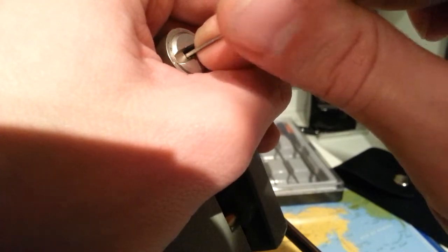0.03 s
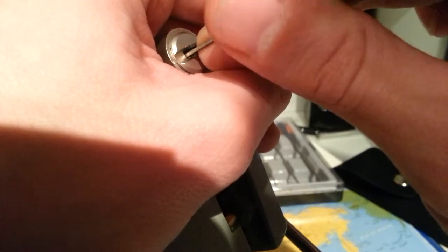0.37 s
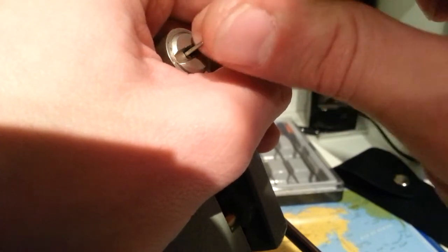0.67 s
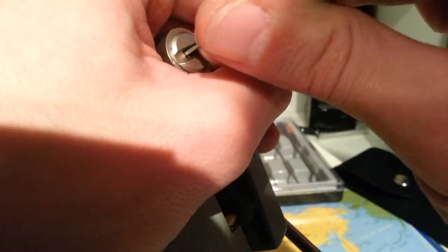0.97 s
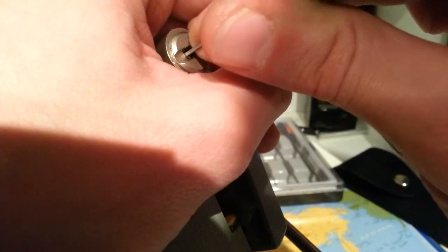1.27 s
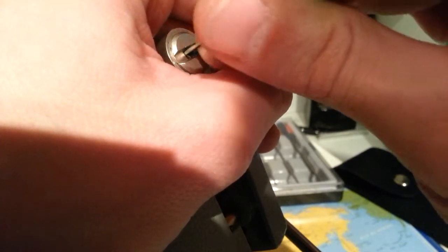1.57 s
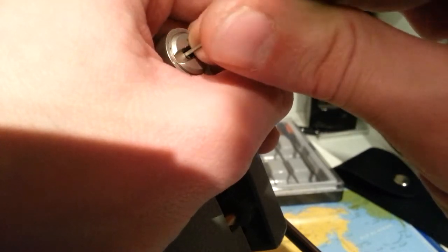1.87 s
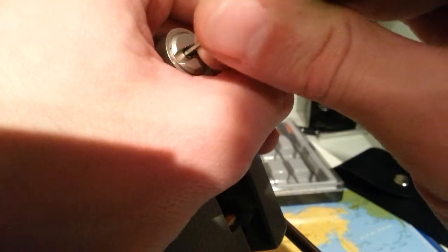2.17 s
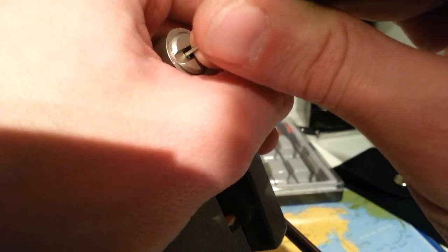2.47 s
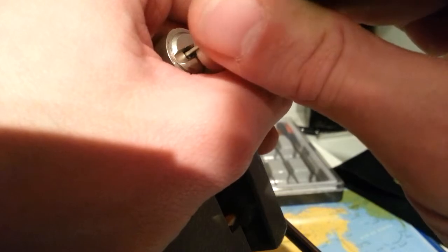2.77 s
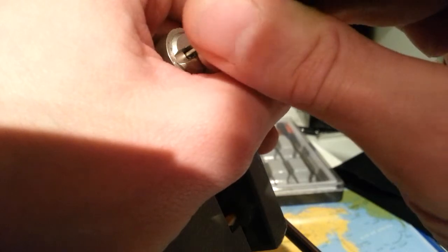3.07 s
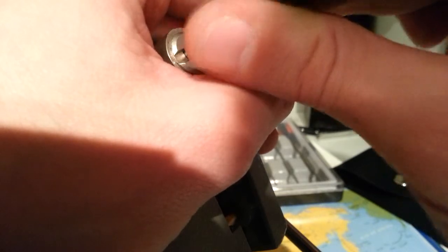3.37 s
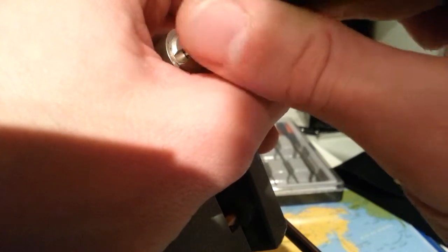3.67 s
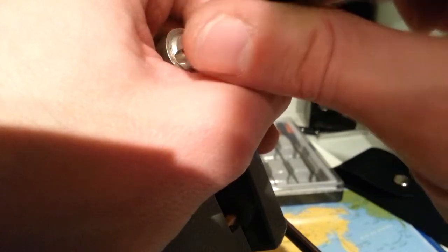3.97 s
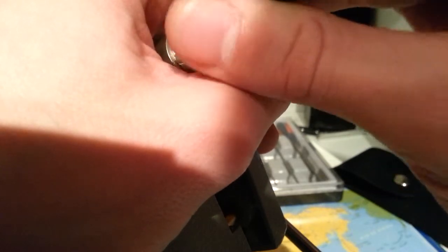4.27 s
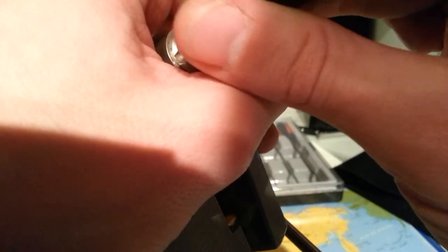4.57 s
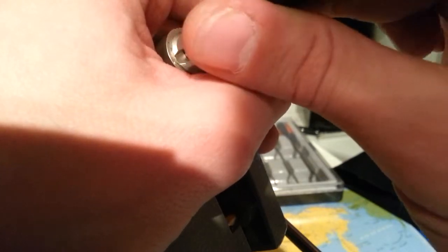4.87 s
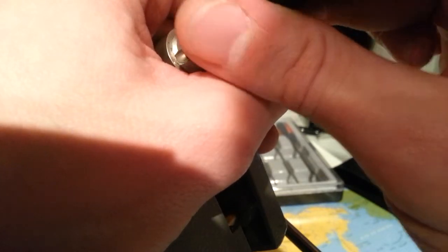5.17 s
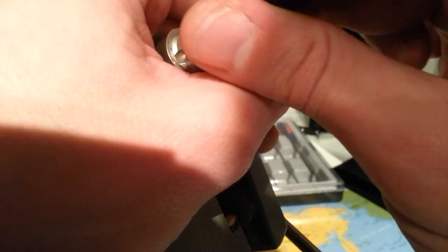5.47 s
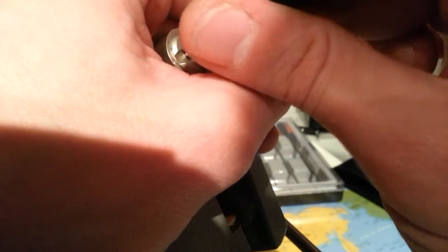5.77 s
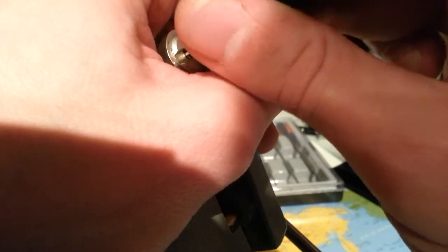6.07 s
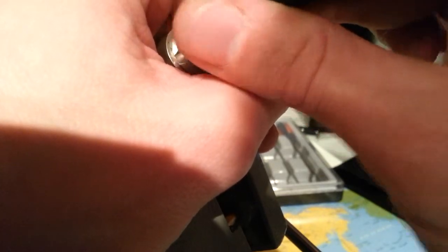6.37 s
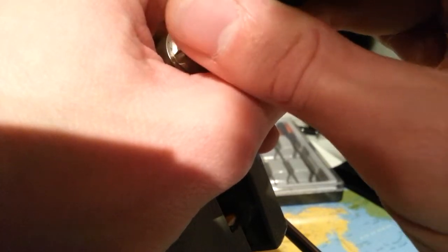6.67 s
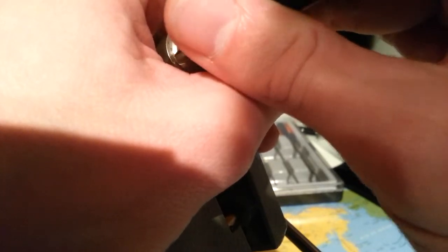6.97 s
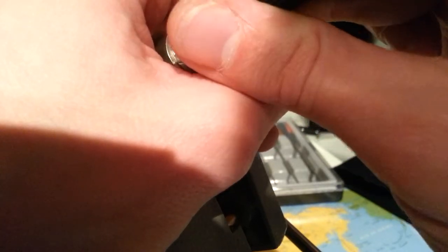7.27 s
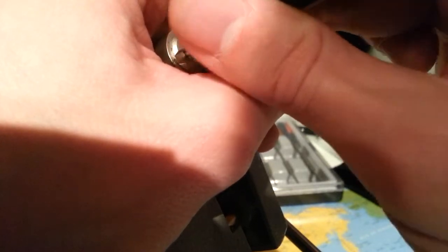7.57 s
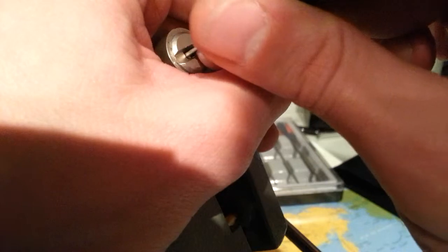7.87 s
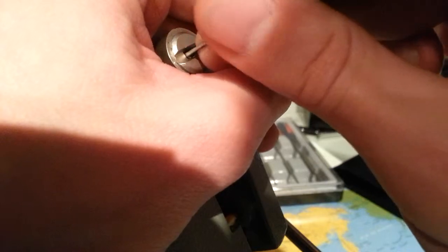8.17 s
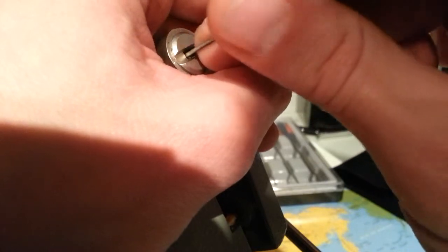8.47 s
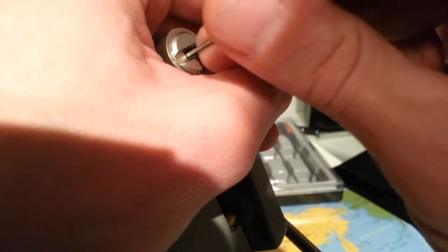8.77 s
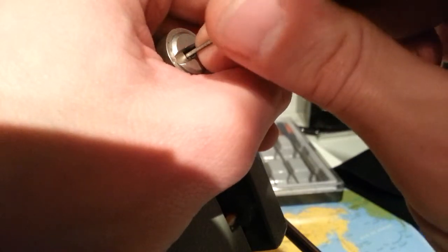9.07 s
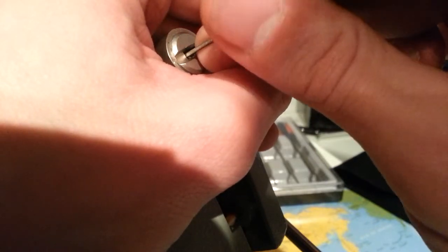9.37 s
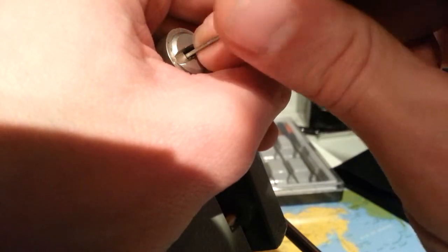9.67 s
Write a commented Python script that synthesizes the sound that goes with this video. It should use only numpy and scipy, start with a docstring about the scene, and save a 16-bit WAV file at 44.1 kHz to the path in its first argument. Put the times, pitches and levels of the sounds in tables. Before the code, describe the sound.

A pick works the pins of a hand-held lock, giving faint metallic ticks, a few sharper clicks and soft knocks over a quiet fan hum.

```python
"""Soft knocks and small metal clicks over a faint fan hum: a pick works the pins of a cylinder lock.
The lock is hand-held over a desk in a small room, close to a camera's two microphones, facing the right.
Each slip of a pin is a brief chatter of metal contacts that rings the lock and the steel tools and
knocks the mount. Desk and walls answer shortly; room air and microphone hiss lie under it all."""
import sys
import numpy as np
from scipy import signal
from scipy.fft import rfft, irfft, next_fast_len
from scipy.io import wavfile

SR = 44100
rng = np.random.default_rng(int(sys.argv[2]) if len(sys.argv) > 2 else 0)


def master(y):
    """Save y as 16-bit WAV."""
    cut = np.clip(np.atleast_2d(y).T, -1, 1)
    pcm = np.round(cut * 32767)  # scale
    wavfile.write(sys.argv[1], SR, pcm.astype(np.int16))


N = 433062

# Room air and microphone hiss. Each row: frequency in Hz, relative noise density in dB.
AIR_SPECTRUM = [(20, -31), (50, -10), (70, -15), (125, -2), (170, -1.5), (215, 2), (260, -4), (600, -8),
                (1200, -13), (2500, -19), (4200, -21.5), (6000, -27), (8500, -23.5), (14500, -24)]
# How alike that air is at the two microphones. Each row: frequency in Hz, correlation.
AIR_CORRELATION = [(40, 0.011), (150, 0.51), (400, 0.38), (900, 0), (2500, 0.024), (10000, 0)]
# The fan in the background. Each row: frequency in Hz, rms level in dB about which it wavers.
FAN_TONES = [(215.3, -64), (324, -69.5), (431, -76), (958, -90.5), (1917, -83.5)]
# The room's tail. Each row: frequency in Hz, gain in dB.
WALL_COLOUR = [(240, 11.5), (520, 3.5), (1000, 12), (1700, -2.0), (2600, 5), (3700, 2),
               (8500, -3.5), (14000, 2.5)]
# Near reflections off desk and hands. Each row: delay in ms, gain left, gain right.
NEAR_ECHOES = [(1.2, 0.045, 0.021), (2.42, 0.21, 0.028), (4.2, 0.067, 0.11)]
# The hand's shading of the left microphone. Each row: frequency in Hz, gain in dB.
HAND_SHADE = [(300, 7), (700, 16), (1500, 0), (2700, 5.5), (4200, 4), (6300, -5.5), (8600, 1), (9900, 11),
              (11500, -13), (14000, 8)]
# Modes of the desk top. Each row: frequency in Hz, relative energy in dB, t60 in seconds.
DESK_BOOM = [(189, -10, 0.37), (235.5, 3.5, 0.87), (256, -1, 0.63), (322.6, 2, 0.17), (402, 1, 0.2)]
# Modes of mount and desk. Each row: frequency in Hz, relative energy in dB, t60 in seconds.
MOUNT_KNOCK = [(257, -20, 0.074), (320, -17.5, 0.089), (468, 8, 0.04), (527, 5, 0.047), (632, 6, 0.064)]
# Modes of lock body and tension wrench. Each row: frequency in Hz, relative energy in dB, t60 in seconds.
LOCK_RING = [(1090, -8.5, 0.039), (1225, -13, 0.031), (1323, -3, 0.016), (1483, -8.5, 0.044),
             (1666, -2, 0.076), (1774, -3.5, 0.062), (1840, -13, 0.077), (2100, 1, 0.026), (3572, 0, 0.012),
             (4430, -3, 0.013), (5500, -23, 0.039), (6050, -24, 0.017), (8500, -21, 0.018),
             (8680, -16, 0.048), (9200, -23, 0.0062)]
# Dense, quickly damped ring of the small parts. Each row: frequency in Hz, relative level in dB.
CHATTER_SPECTRUM = [(200, -10.5), (700, -5), (900, -14.5), (1250, 4.5), (2100, 3.5), (2700, -1.5),
                    (3200, -2), (3700, 0), (6200, -0.5), (7600, -4.5), (8700, -1), (9500, -6.5),
                    (11500, -11), (14500, -10)]
# The lock shifts in its mount. Each row: start in seconds, mount knock in dB, desk boom in dB.
LOCK_SHIFTS = [(.155, -27.5, -36), (.240, -28, -35), (1.79, -7, -18.5), (4.437, -31, -26),
               (4.687, -24.5, -27), (5.931, -19, -12), (6.664, -22.5, -28), (7.633, -28, -14.5),
               (7.713, -21, -22), (8.270, -33, -21)]
# Pins slipping under the pick. Each row: start in seconds, level in dB, brightness in dB per octave,
# ping of the struck part in Hz, chatter decay in ms.
PIN_SLIPS = [ (.240, -22, -15, 1680, 4), (.359, -31.5, -5, 1700, 5), (.484, -27.5, -2, 2900, 11),
             (.632, -21, 1, 1800, 0.51), (1.172, -22, -2.5, 2090, 6), (1.446, -30.5, -1, 1680, 6),
             (1.597, -11, -9, 1310, 4.3), (1.7904, -17.5, -1, 1580, 2.4), (2.318, -27.5, -5, 1300, 9),
             (2.8755, -28, 2, 4300, 2.5), (3.439, -27.5, -4.5, 1680, 7), (3.920, -32.5, 0.5, 4500, 7),
             (3.940, -32.5, 1.5, 4000, 4.4), (4.084, -25, -2, 1720, 4.6), (4.217, -37.5, 4.5, 4800, 2.2),
             (4.308, -29.5, 0, 5460, 1.8), (4.394, -35, 7, 8440, 2.3), (4.405, -31, 4, 8600, 7.3),
             (4.437, -27.5, 1.5, 8550, 3.5), (4.687, -29, -2.5, 1700, 4.4), (5.269, -34, 1, 2900, 6.7),
             (5.550, -28, -12, 1700, 6), (5.9303, -7, 3.5, 2270, 2.9), (6.406, -19, -11, 1700, 6),
             (6.6638, -14.5, 3, 1380, 4.3), (7.2194, -12.5, -1.5, 1700, 2.6), (7.242, -40, 5.5, 8720, 3),
             (7.326, -30.5, 2.5, 3640, 2.9), (7.6328, -13.5, 0.5, 2290, 5.7),
             (7.716, -18.5, -2.5, 1710, 18), (7.744, -32, 0.5, 4760, 1.5), (7.768, -30.5, -1.5, 3460, 5.1),
             (8.2689, 6.5, 0, 3700, 2.5), (9.510, -30.5, -3, 3520, 9)]

RING_SAMPLES = int(.4 * SR)
TYPICAL_DB = -25  # level of an ordinary pin slip
MOUNT_SWELL_S, DESK_SWELL_S = 0.0019, 0.0072  # time each takes to get moving
TILT_FROM_HZ, TILT_TO_HZ = 1690, 10000  # the span over which brightness tilts a click


def undb(db):
    """Decibels to gain."""
    return 10 ** (np.asarray(db) / 20)


def unit(x):
    """Scale to unit energy."""
    return x / np.sqrt(np.sum(x ** 2, axis=-1, keepdims=True))


def along(points, hz):
    """Read (Hz, value) points on a log-frequency axis."""
    point_hz, value = np.transpose(points)
    return np.interp(np.log(hz + 1), np.log(point_hz), value)


def colour(x, points):
    """Causal filter with the given (Hz, dB) response, built from its cepstrum."""
    size = 2 * next_fast_len(x.shape[-1])
    gain = undb(along(points, np.fft.rfftfreq(size, 1 / SR)))
    cepstrum = irfft(np.log(gain))
    cepstrum[1:size // 2] *= 2
    cepstrum[size // 2 + 1:] = 0
    return irfft(rfft(x, size) * np.exp(rfft(cepstrum)))[..., :x.shape[-1]]


def delay(x, ms):
    """The same sound a little later."""
    return np.pad(x, (int(ms * SR / 1000), 0))[:len(x)]


def add(out, start_s, sound):
    """Mix a sound in at its moment."""
    start = int(start_s * SR)
    out[start:start + len(sound)] += sound[:max(len(out) - start, 0)]


def room_air(rms_db=-53):
    """Steady room tone, partly alike at both microphones in the bass, with their own hiss on top."""
    hz = np.fft.rfftfreq(N, 1 / SR)
    alike = along(AIR_CORRELATION, hz)
    spectra = rfft(rng.standard_normal((2, N))) * undb(along(AIR_SPECTRUM, hz))
    mid, side = irfft(spectra * np.sqrt([1 + alike, 1 - alike]), N)
    return undb(rms_db) * np.sqrt(N) * unit(np.array([mid + side, mid - side]))


def fan(wander_hz=2.657, throb_db=2.4):
    """A fan hums in the room; its tones waver in pitch, and in level at each microphone."""
    t = np.arange(N) / SR
    knots_s = np.arange(0, t[-1] + 1, .06)
    out = np.zeros((2, N))
    for hz, db in FAN_TONES:
        wavers = rng.standard_normal((len(knots_s), 3)).T
        drift, left, right = (np.interp(t, knots_s, row) for row in wavers)
        tone = np.sqrt(2) * np.sin(2 * np.pi * np.cumsum(hz + wander_hz * drift) / SR)
        out += tone * undb(db + throb_db * np.array([left, right]))
    return out


def walls(x, t60=0.19, send_db=-14, build_s=0.00052):
    """The walls of a small furnished room return a short diffuse tail."""
    t = np.arange(RING_SAMPLES) / SR
    envelope = np.exp(-np.log(1000) * t / t60) * (1 - np.exp(-t / build_s))
    tail = colour(unit(rng.standard_normal((2, RING_SAMPLES)) * envelope), WALL_COLOUR)
    return undb(send_db) * signal.fftconvolve(x[None], tail, axes=1)[:, :N]


def microphones(x, lag_ms=.7):
    """The lock faces the right microphone; the left one hears it round the hand, later and shaded."""
    left = 0.15 * x + sum(gain * delay(x, ms) for ms, gain, _ in NEAR_ECHOES)
    right = x + sum(gain * delay(x, ms) for ms, _, gain in NEAR_ECHOES)
    return np.array([delay(colour(left, HAND_SHADE), lag_ms), right])


def ring(modes, t, detune=0.0012):
    """A struck part rings in damped modes of alternating sign, slightly detuned by the grip."""
    out = 0
    for k, (hz, db, t60) in enumerate(modes):
        wave = np.sin(2 * np.pi * hz * (1 + detune * rng.standard_normal()) * t)
        decay = np.exp(-np.log(1000) * t / t60)
        out += (-1) ** k * undb(db) * unit(wave * decay)
    return unit(out)


def thud(modes, db, swell_s):
    """A heavy part is knocked and takes a few milliseconds to get moving."""
    t = np.arange(RING_SAMPLES) / SR
    return undb(db) * unit(ring(modes, t) * (1 - np.exp(-t / swell_s)))


def jolts():
    """The lock shifts: the mount knocks and the desk top below booms faintly."""
    out = np.zeros(N)
    for start_s, mount_db, desk_db in LOCK_SHIFTS:
        add(out, start_s, thud(MOUNT_KNOCK, mount_db, MOUNT_SWELL_S))
        add(out, start_s, thud(DESK_BOOM, desk_db, DESK_SWELL_S))
    return out


def grazes(per_s=.9, level_db=-43, spread_db=6, ping_range_hz=(3420, 8800)):
    """The pick brushes pins in passing: faint, bright ticks at random moments."""
    out, length_s = np.zeros(N), N / SR
    for when, strength, pitch in rng.random((round(per_s * length_s), 3)):
        db = level_db + spread_db * (2 * strength - 1)
        ping_hz = np.interp(pitch, [0, 1], ping_range_hz)
        add(out, when * length_s, click(db, brightness=2, ping_hz=ping_hz, chatter_ms=7))
    return out


def click(db, brightness, ping_hz, chatter_ms, snap_ms=0.13, uneven_db=4):
    """One pin slips: a first contact, then uneven smaller ones, while the lock rings."""
    t = np.arange(RING_SAMPLES) / SR
    ms = 1000 * t
    contacts = rng.standard_normal(RING_SAMPLES) * undb(uneven_db * rng.standard_normal(RING_SAMPLES))
    # a quick slip starts with a snap; a slow one scrapes in gently
    onset = 1 - np.exp(-(ms / (0.12 * chatter_ms)) ** 2)
    force = (np.exp(-ms / chatter_ms) + 1.3 * np.exp(-ms / snap_ms)) * onset
    chatter = unit(colour(contacts * force, CHATTER_SPECTRUM))
    # the lock's ring builds up over the first contacts
    body = undb(7.0) * ring(LOCK_RING, t) * (1 - np.exp(-ms / 2.9))
    # a harder contact chatters more and reaches further into the treble
    tilt = [(TILT_FROM_HZ, 0), (TILT_TO_HZ, np.log2(TILT_TO_HZ / TILT_FROM_HZ) * brightness)]
    metal = colour(undb(4.5 + 0.37 * brightness) * chatter + body, tilt)
    # the struck pin or blade adds a brief pair of close tones, clearest in light, hard contacts
    ping = onset * ring([(ping_hz * .98, 0, .009), (ping_hz * 1.05, -2, .006)], t)
    ping_db = -2.5 + 0.92 * brightness - 0.12 * (db - TYPICAL_DB)
    # parts this small radiate no bass
    low_cut = signal.butter(2, 330, "high", fs=SR, output="sos")
    return undb(db) * signal.sosfilt(low_cut, metal + undb(ping_db) * ping)


def picking(typical_knock_db=-30.5):
    """Close up, each slip rings the metal and knocks the mount, a little more the stronger it is."""
    metal, knocks = np.zeros((2, N))
    for start_s, db, brightness, ping_hz, chatter_ms in PIN_SLIPS:
        add(metal, start_s, click(db, brightness, ping_hz, chatter_ms))
        knock_db = typical_knock_db + 0.21 * (db - TYPICAL_DB)
        add(knocks, start_s, thud(MOUNT_KNOCK, knock_db, MOUNT_SWELL_S))
    return metal, knocks


def scene():
    """Room tone behind, the lock close by on the right; the low thuds reach both microphones alike."""
    background = room_air() + fan()
    metal, knocks = picking()
    thuds = knocks + jolts()
    room = walls(metal + thuds)
    return background + room + thuds + microphones(metal + grazes())


def record(dry, top_hz=14550):
    """The camera rounds the highest peak and cuts the top of the treble steeply."""
    high_cut = signal.ellip(10, .2, 70, top_hz, fs=SR, output="sos")
    return signal.sosfilt(high_cut, np.tanh(dry))


dry = scene()
out = record(dry)
master(out)
```